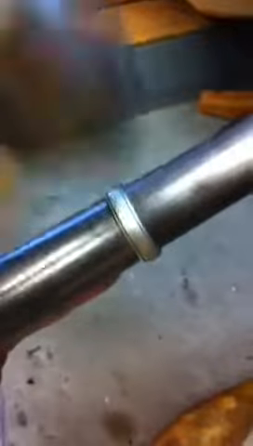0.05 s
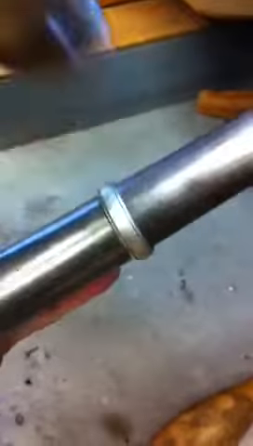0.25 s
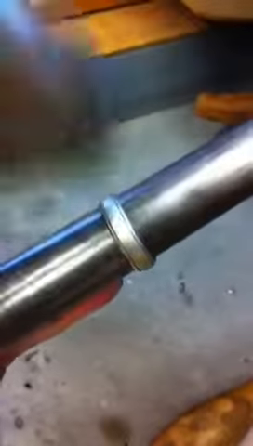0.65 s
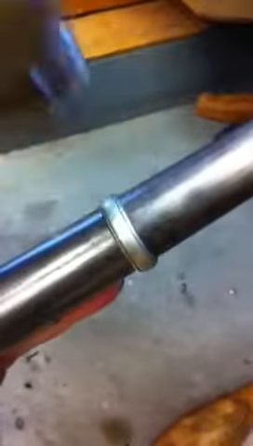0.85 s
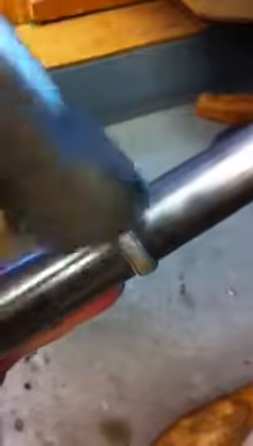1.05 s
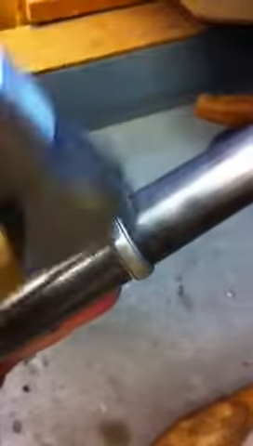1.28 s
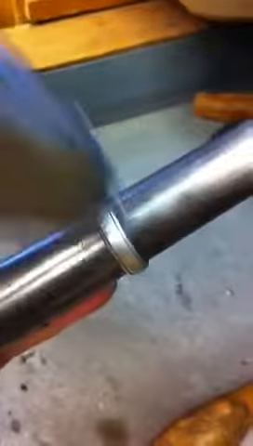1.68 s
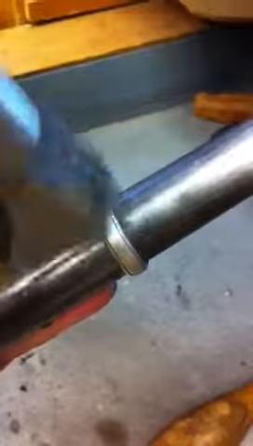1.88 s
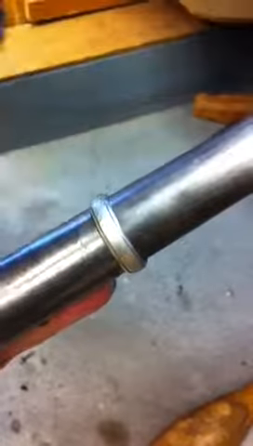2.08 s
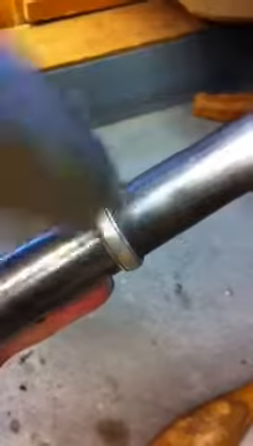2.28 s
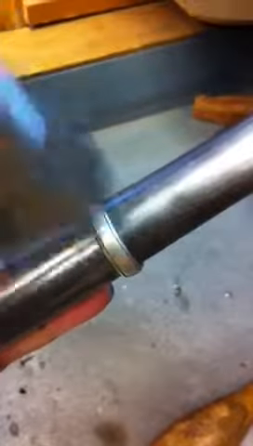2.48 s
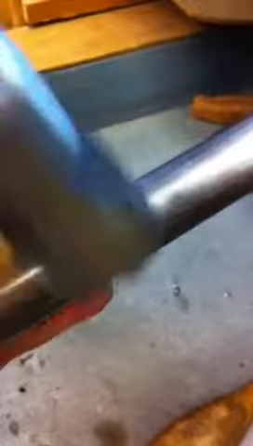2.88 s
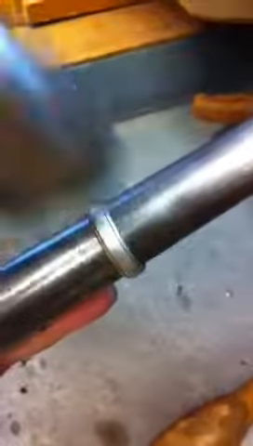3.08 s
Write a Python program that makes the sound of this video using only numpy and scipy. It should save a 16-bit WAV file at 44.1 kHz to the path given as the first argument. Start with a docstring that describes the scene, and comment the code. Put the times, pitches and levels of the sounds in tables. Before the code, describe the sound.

Ten sharp, steady hammer taps on a metal ring and steel rod in a small workshop.

```python
"""A machine hums over the room tone of a small workshop. Close by, a small hammer taps a ring on a
hand-held steel mandrel ten times. Each impact cracks, excites the damped modes of the steel and,
a few milliseconds later, those of the bench beneath; the room reverberates briefly.
Amid the blows the machine winds down, letting out a puff of air."""
import sys
import numpy as np
from scipy import signal
from scipy.fft import rfft, irfft
from scipy.io import wavfile
from scipy.ndimage import uniform_filter1d

SR = 44100
rng = np.random.default_rng(int(sys.argv[2]) if len(sys.argv) > 2 else 0)


def pcm_store(signal):
    """Save signal as 16-bit PCM."""
    levels = np.round(np.clip(np.atleast_2d(signal), -1, 1) * 32767)
    wavfile.write(sys.argv[1], SR, levels.astype(np.int16).T)


N = 143325
T = np.arange(N) / SR

# blows (time [s], level [dB], crack gain [dB], crack tilt [dB/octave], thump gain [dB],
# bright mode gain [dB])
HAMMER_BLOWS = [(0.228, 5, 2, -1.5, 2.5, -11), (0.5252, 6, 1.5, -1.5, 0, -12), (0.8309, 4, 3.5, -2, 3, -2),
                (1.1358, 5, 2, -2.54, -2, -10.5), (1.4292, 4.5, 1.5, -0.5, -3, 1),
                (1.7340, 3.5, 2.7, -2, -1, -6), (2.0366, 3, 1.5, -0.3, -0.5, 2),
                (2.3450, 3, 1.5, 0, -1.5, 0.5), (2.6447, 3, 2.5, -0.9, -.5, 1),
                (2.9420, 4.5, 1.5, -1, -2.5, -1)]
# modes of mandrel, ring and hammer head (frequency [Hz], level [dB], t60 [s], rise [s])
STEEL_MODES = [(1048, -18.5, 0.051, 0.002), (1084.7, -9.5, 0.05, 0.0052), (1820, -25, 0.023, 0.00041),
               (1853, -22, .025, 0.00027), (2445, -11, 0.047, 0.0009), (2747, -19.5, 0.025, 0.00022),
               (4332, -10, 0.045, 0.0018), (4461, -11.5, .012, .0005), (5280, -26.5, 0.02, .0003),
               (6855, -26, 0.037, 0.00055), (9515, -25.5, 0.01, .0003), (9880, -24.5, 0.032, .0005),
               (13150, -34, 0.015, 0.00036)]
# modes of the bench (frequency [Hz], level [dB], t60 [s])
BENCH_MODES = [(132, -50, 0.36), (179, -32, 0.27), (245, -35, 0.18), (306, -31.5, 0.27),
               (360.8, -15, 0.049), (420.7, -31.5, .13), (462.3, -23.5, 0.056), (576.3, -20, 0.058),
               (654, -28.5, 0.032), (854, -27.5, 0.072)]
# workshop reverberation (frequency [Hz], level [dB], t60 [s])
ROOM_BANDS = [(100, -11, 0.12), (282, -9, 0.12), (600, -13.5, .25), (850, -12, 0.2), (1080, -15, 0.29),
              (1500, -9.5, 0.14), (2400, -27.5, 0.32), (4100, -21, .29), (5500, -33, 0.55),
              (6900, -17, 0.36), (8500, -18, .18), (14000, -17.5, .15)]
# spectra (frequency [Hz], relative spectral density [dB])
FLOOR_SPECTRUM = [(20, -70), (60, -0.5), (85, -18), (122, 7.5), (160, -6), (240, 4.5), (320, 0),
                  (400, -7.5), (560, -9.5), (800, -16.5), (2000, -24.5), (5200, -29.5), (8500, -23.5),
                  (11300, -15.5), (15500, -25.5)]  # room tone and microphone hiss
MACHINE_SPECTRUM = [(60, -26), (170, -14), (225, -5.5), (300, -0.5), (360, -7), (470, -6.5), (560, 3),
                    (660, -9.5), (720, -3), (870, -21.5), (980, -9), (1080, -18), (1170, -7), (1300, -14.5),
                    (1900, -22.5), (2200, -15.5), (4000, -22.5), (7500, -28.5), (11000, -24),
                    (16000, -38.5)]  # running machine
CRACK_SPECTRUM = [(60, -35.5), (300, -26), (580, 1.5), (800, -10), (1100, -24), (1350, -9), (1580, -6.5),
                  (1850, -0.5), (2500, -4.5), (3150, -6), (3900, -10.5), (4550, -4), (5300, -11),
                  (6500, -17), (7700, -30), (9000, -25), (10200, -15.5), (12500, -26.5), (15000, -30.5),
                  (16000, -51.5)]  # hammer contact
HISS_SPECTRUM = [(300, -7), (2000, 3.5), (5000, 1), (7400, 9.5), (9000, 5.5), (12000, 11.5), (14500, 0),
                 (16000, 9)]  # escaping air, also the treble swell


def amp(db):
    """Decibels to amplitude ratio."""
    return 10 ** (np.asarray(db) / 20)


def read(points, hz):
    """Linear interpolation on a log-frequency axis."""
    f, value = np.transpose(points)
    return np.interp(np.log(hz + 1), np.log(f + 1), value)


def fade(t, t60):
    """Exponential decay, 60 dB down after t60."""
    return np.exp(-np.log(1000) * np.maximum(t, 0) / t60)


def add(mix, start_s, sound):
    """Superposition: a sound joins the mix at its onset."""
    part = mix[round(start_s * SR):][:len(sound)]
    part += sound[:len(part)]


def noise(spectrum):
    """Spectral shaping: white noise takes on a colour, at rms 1."""
    gain = amp(read(spectrum, np.fft.rfftfreq(N, 1 / SR)))
    x = irfft(rfft(rng.standard_normal(N)) * gain, N)
    return x / x.std()


def room_tone():
    """Stationary noise: room tone and microphone hiss."""
    return amp(-50) * noise(FLOOR_SPECTRUM)


def machine(stop_s=1.1, fall_db_per_s=50):
    """Noise with low spectral peaks hums, then decays exponentially as the machine winds down."""
    return amp(-43 - fall_db_per_s * np.maximum(T - stop_s, 0)) * noise(MACHINE_SPECTRUM)


def scatter(t, t60):
    """Scattering: a dying spray of tiny reflections, of unit energy."""
    x = rng.choice([-1., 1.], len(t)) * fade(t, t60)
    return x / np.linalg.norm(x)


def grit(t):
    """Impact noise: a fast burst at the contact and a longer clatter off the bench top."""
    return amp(12) * scatter(t, t60=0.012) + amp(13.5) * scatter(t, t60=0.053)


def crack(contact, tilt_db, pivot_hz=2000, size=2048):
    """Source and filter: the contact excites a minimum-phase, hence causal, response."""
    spectrum = [(hz, db + tilt_db * np.log2(hz / pivot_hz)) for hz, db in CRACK_SPECTRUM]
    log_gain = np.log(amp(read(spectrum, abs(np.fft.fftfreq(size, 1 / SR)))))
    response = np.exp(np.conj(signal.hilbert(log_gain)))
    click = np.fft.ifft(response).real[:size // 2]
    return signal.fftconvolve(contact, click)


def steel(t, bright_db, bright_hz=6855, spread_db=2.5, detune=0.00053):
    """Free vibration: the hand-damped mandrel rings in bending modes; ring and hammer ping."""
    out = np.zeros(len(t))
    for hz, db, t60, rise in STEEL_MODES:
        if hz == bright_hz:  # this mode depends on where the blow lands
            db += bright_db
        db += spread_db * rng.standard_normal()
        hz *= 1 + detune * rng.standard_normal()
        envelope = (1 - np.exp(-t / rise)) * fade(t, t60)
        out += amp(db) * envelope * np.sin(2 * np.pi * hz * t)
    return out


def bench(t, rise_s=0.0016):
    """Mechanical coupling: the mandrel pushes into the wooden bench and excites its low modes."""
    onset = np.exp(-(np.minimum(t, 0) / rise_s) ** 2)
    return onset * sum(amp(db) * fade(t, t60) * np.cos(2 * np.pi * hz * t) for hz, db, t60 in BENCH_MODES)


def hammer(thump_delay_s=0.005976, rebound_s=0.008995, grit_change=0.45):
    """Impulsive excitation: each blow gives a crack, a ring and a thump with a weaker rebound."""
    t = T[:SR // 3]
    cracks, rings, thumps = np.zeros((3, N))
    thump = bench(t - thump_delay_s) + amp(-10) * bench(t - thump_delay_s - rebound_s)
    snap = amp(10) * (t == 0)
    # the blows land near one spot, so they share most of their grit
    shared_grit = np.sqrt(1 - grit_change ** 2) * grit(t)
    for start_s, db, crack_db, tilt_db, thump_db, bright_db in HAMMER_BLOWS:
        contact = snap + shared_grit + grit_change * grit(t)
        add(cracks, start_s, amp(db + crack_db) * crack(contact, tilt_db))
        add(rings, start_s, amp(db) * steel(t, bright_db))
        add(thumps, start_s, amp(db + thump_db) * thump)
    return cracks, rings, thumps


def workshop(sound, delay_s=0.016):
    """Reverberation: a diffuse field dies away at its own rate in each band."""
    hz, t, bands = signal.stft(rng.standard_normal(SR // 2), SR, nperseg=256)
    db, t60 = (read(np.array(ROOM_BANDS)[:, [0, k]], hz)[:, None] for k in (1, 2))
    energy_norm = np.sqrt(2 * np.log(1000) / (t60 * SR))
    _, response = signal.istft(bands * amp(db) * fade(t, t60) * energy_norm, SR, nperseg=256)
    out = np.zeros(N)
    add(out, delay_s, signal.fftconvolve(sound, response))
    return out


def treble_swell(peak_s=1.075, width_s=0.045):
    """Amplitude modulation: a faint hiss swells once under a Gaussian envelope."""
    return amp(-48) * np.exp(-((T - peak_s) / width_s) ** 2) * noise(HISS_SPECTRUM)


def air_puff(start_s=1.322, rise_s=0.0018):
    """Turbulence: escaping air hisses in a short burst with a longer tail."""
    t = T - start_s
    onset = np.exp(np.minimum(t, 0) / rise_s)
    decay = amp(-40) * fade(t, t60=0.04) + amp(-36) * fade(t, t60=0.26)
    return onset * decay * noise(HISS_SPECTRUM)


def scene():
    """Superposition: the blows, their reverberation and the background sum in one channel."""
    cracks, rings, thumps = hammer()
    reverb = workshop(cracks + amp(-3.5) * rings + thumps)
    background = room_tone() + machine() + treble_swell() + air_puff()
    return (background + cracks + rings + thumps + reverb)[None]


def record(dry, limit_db=-8, recovery_db_per_s=8.5, ceiling=0.88, cutoff_hz=16000):
    """Compression: a limiter ducks at the blows and recovers slowly; saturation and a low-pass follow."""
    power_db = 10 * np.log10(abs(uniform_filter1d(dry[0] ** 2, size=200)) + 1e-12)
    recovery_db = recovery_db_per_s * T
    held_db = np.maximum.accumulate(power_db + recovery_db) - recovery_db
    duck_db = np.maximum(held_db - limit_db, 0)
    saturated = ceiling * np.tanh(dry * amp(-duck_db) / ceiling)
    lowpass = signal.firwin(511, cutoff_hz, window=("kaiser", 9), fs=SR)
    return signal.oaconvolve(saturated, lowpass[None], "same")


dry = scene()
out = record(dry)
pcm_store(out)
```